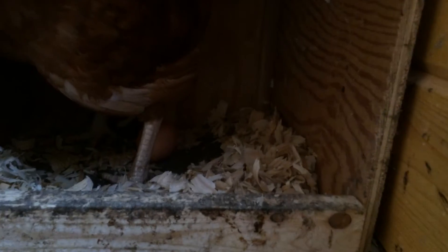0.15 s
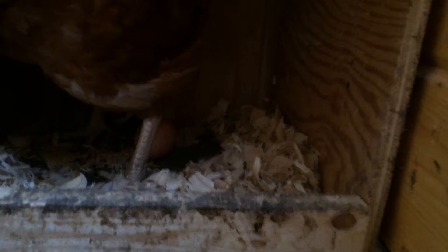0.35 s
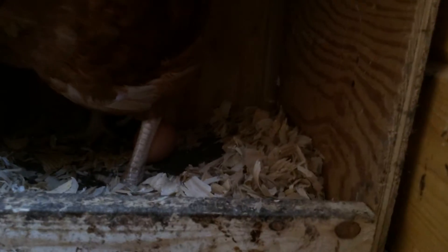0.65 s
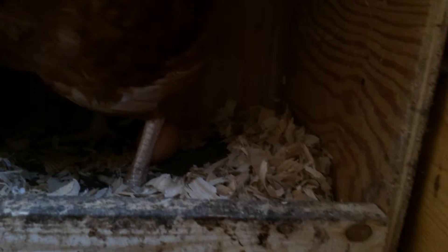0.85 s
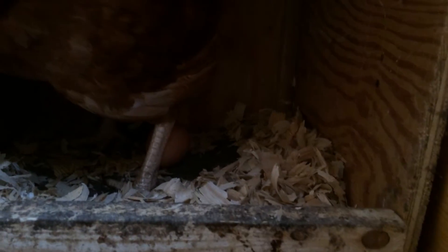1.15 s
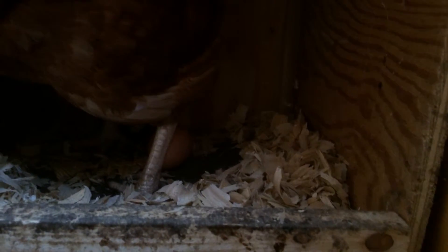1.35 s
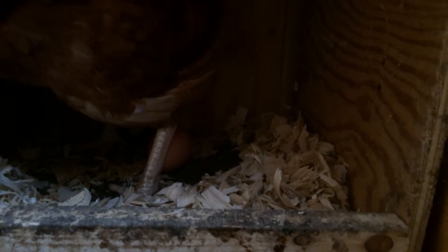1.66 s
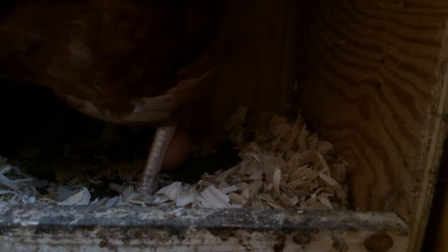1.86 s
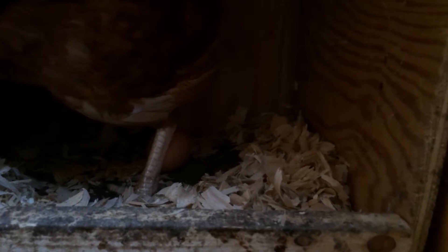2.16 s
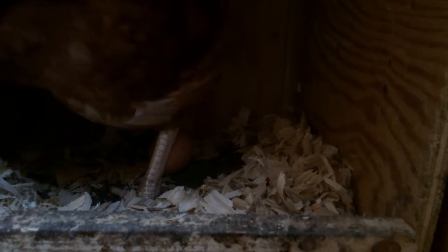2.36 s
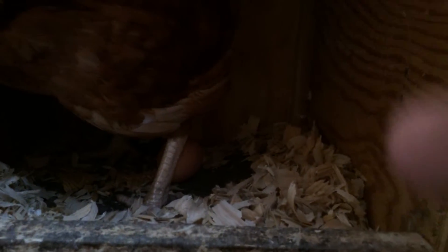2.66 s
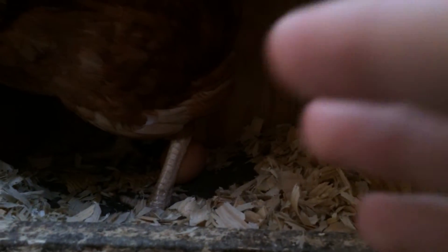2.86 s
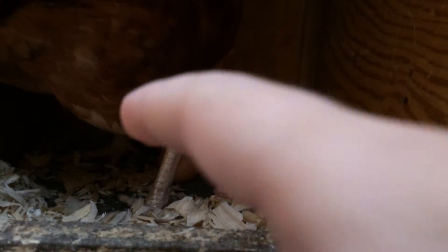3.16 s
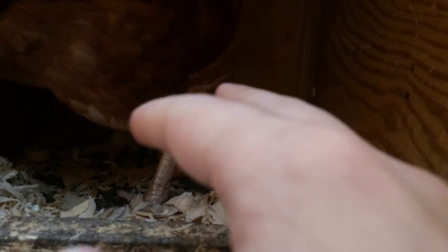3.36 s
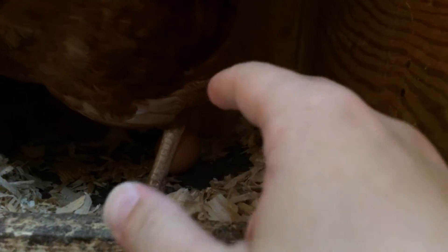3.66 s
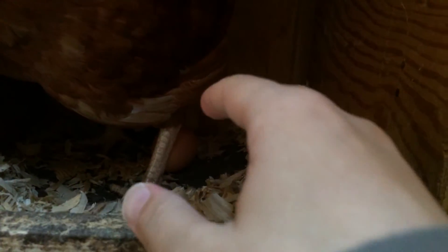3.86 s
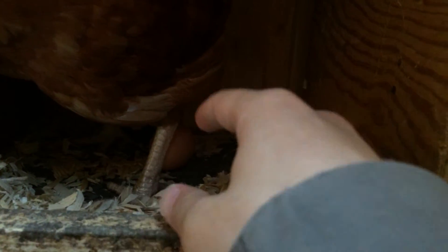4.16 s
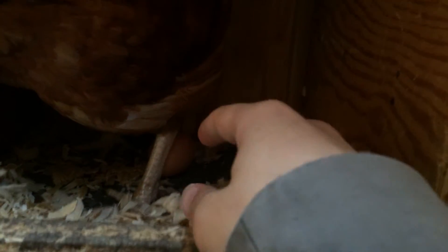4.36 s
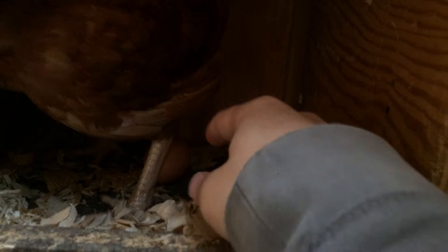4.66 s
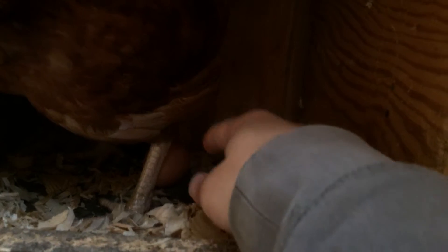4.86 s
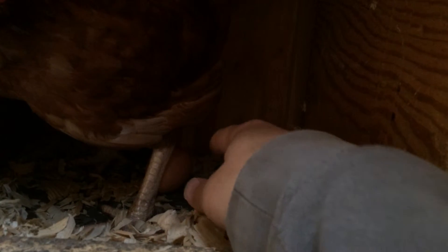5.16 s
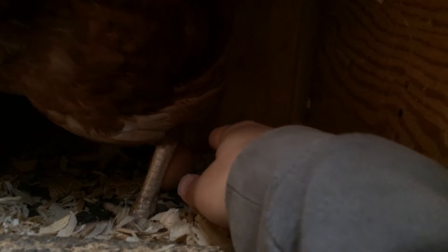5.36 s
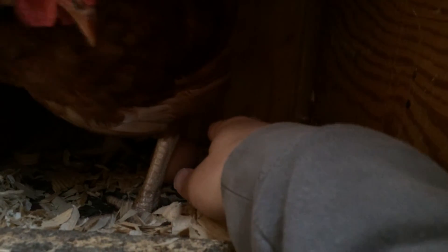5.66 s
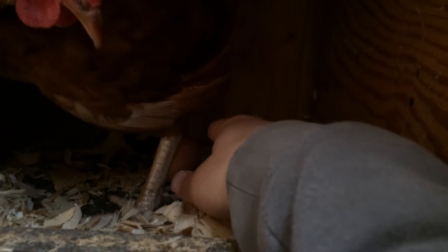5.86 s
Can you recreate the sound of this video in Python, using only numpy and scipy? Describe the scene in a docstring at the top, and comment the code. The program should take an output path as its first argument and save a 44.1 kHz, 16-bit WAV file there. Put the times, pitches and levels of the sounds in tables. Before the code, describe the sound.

One hen, heard close in a small wooden nest box, gives a long nasal whine broken by fast fluttering flicks upward, then a short rough squawk. A run of low, rapid clucks follows. After a pause she makes a brief soft coo that slides into a long, wavering moan. A low fan hum and soft airy hiss continue throughout, with a few tiny ticks of dry shavings.

```python
"""A hen in a wooden nest box protests: a whine, a squawk, a cackle, and a coo that sinks into a long moan.
Each call is a slow drone of a buzzing syrinx, heard through the resonances of throat and beak.
From it her voice flutters or leaps up onto a sharp resonance, or drops into loud, low clucks.
Wood shavings tick in the nest as short noise bursts, and the box adds scatter and a faint ring.
A fan hums and hisses in the coop: unsteady tones over coloured noise."""
import sys
import numpy as np
from scipy import signal
from scipy.fft import rfft, irfft, next_fast_len
from scipy.io import wavfile
from scipy.ndimage import map_coordinates

SR = 44100
rng = np.random.default_rng(int(sys.argv[2]) if len(sys.argv) > 2 else 0)


def int16_out(signal):
    """Quantize to a 16-bit WAV file."""
    q = np.round(np.clip(np.atleast_2d(signal).T, -1, 1) * 32767)
    wavfile.write(sys.argv[1], SR, q.astype(np.int16))


N = 265041
TIME = np.arange(N) / SR

FLICK_GAP_S = .0245  # period of the flicks in a flutter and of the quaver
SWITCH_S = 0.0054  # the time a change of register takes


def hen():
    """Source and filter: the syrinx sounds through the throat, so a note on a resonance rings out loudly."""
    pitch, effort, bright_db, rasp_db = gestures()
    return filtered(effort * syrinx(pitch, bright_db, rasp_db), throat)


def gestures(release_s=0.0075, overhang_s=0.0064, edge_dull_db=-14):
    """Motor control: slow drones carry the pitch, effort, brightness and rasp that quick gestures then pull."""
    # the drone under each call:
    # time_s, pitch_hz, effort_db, brightness_db_per_octave of overtone, rasp_db (relative)
    whine = [(0, 1105, -30.5, 3, -11), (.14, 980, -18.5, -9, -21), (.39, 970, -20.5, -2.5, -19),
             (.58, 890, -18.5, -5, -24.5), (.79, 895, -19.5, -5, -29), (.93, 930, -18.5, 1, -15),
             (1, 840, -22, -8, -0.5), (1.06, 950, -21, 0, -2.5), (1.19, 820, -17.5, -8.5, -11),
             (1.288, 870, -22.5, -5, 2.5)]
    squawk = [(1.527, 703, -31, -2.5, -23.5), (1.59, 762, -15.5, -8.5, -1), (1.636, 797, -16, -3, -29.5),
              (1.691, 815.6, -16, -5, -18), (1.76, 813.4, -16, -6, -3), (1.828, 803, -17.5, -2, -12),
              (1.869, 965, -17, -8.5, -6.5)]
    cackle = [(2.061, 670, -23.5, -3, -14.5), (2.668, 646.8, -20, -6, -4.5)]
    coo = [(3.69, 900, -27.5, -16, -26), (3.742, 985.3, -19, -16, -17), (3.862, 946.8, -18, -11, -22),
           (3.92, 969.7, -13.5, -22, -32.5), (3.968, 1100, -23.5, -6, -30), (4.02, 1018, -17.5, -10.5, -19)]
    moan = [(4.07, 764.4, -18.5, -3, -22.5), (4.108, 828.6, -20.5, -3.5, -5.5),
            (4.262, 760, -14.5, -7, -38), (4.36, 784, -13, -10, -23), (4.44, 854.4, -18.5, -6, -16.5),
            (4.6, 839, -18, -4.5, -7.5), (4.841, 809.7, -21.5, -3, -24), (5.02, 853, -22.5, -1.5, -6.5),
            (5.169, 832.2, -20, -3, -1), (5.435, 748.4, -19.5, -6, -11)]
    calls = [whine, squawk, cackle, [*coo, *moan]]
    drone = np.array(curves(np.vstack(calls)))
    pitch, effort_db, bright_db, rasp_db = cluck(leap(flutter(quaver(drone))))

    # each call starts and ends as a soft, nearly pure tone
    sounding = np.zeros(N)
    for call in calls:
        start, end = call[0][0], call[-1][0]
        inside = np.minimum(TIME - start, end - TIME) + overhang_s
        sounding += np.clip(inside / release_s, 0, 1)
    edge_db = edge_dull_db * (1 - sounding)
    return pitch, amp(effort_db) * np.sqrt(sounding), bright_db + edge_db / 2, rasp_db + edge_db


def quaver(voice, uneven=.25, bright_db_swing=-0.26):
    """Frequency modulation: an uneven tremor of pitch, with a slight dulling on each upswing."""
    # depth of the tremor on the drone: pitch_hz, share_of_pitch
    depths = [(780, 0.011), (900, 0.019), (1000, .028), (1100, .01)]
    pitch, effort_db, bright_db, rasp_db = voice
    beats = np.cumsum(1 + uneven * wobble(30)) / (FLICK_GAP_S * SR)
    swing = np.sin(2 * np.pi * beats)
    trembling = pitch * (1 + along(depths, pitch) * swing)
    return np.array([trembling, effort_db, bright_db + bright_db_swing * swing, rasp_db])


def flutter(voice):
    """Periodic register switching: a bout lifts the drone and flicks it up at a steady rate."""
    # bouts of flicks into the high register: start_s, flicks, pitch_hz, effort_db (before the swell),
    # fade_db per flick away from the second, kept (share of the lift held between flicks)
    bouts = [(.212, 4, 1118, -12.5, 3.5, .8), (0.449, 4, 1116, -14, 4.5, 1), (.644, 3, 1137, -13, 2, 0.85),
             (.849, 5, 1125, -12.5, 2.5, .2), (1.099, 3, 1130, -16.5, -0.5, .05),
             (1.751, 2, 1033, -12.5, -1, 0.19), (5.12, 2, 1122, -22, -2.5, .05)]
    margin_s, edge_s, below_hz, dip_db = .014, 0.025, 25, 12  # the lift between flicks
    half_s, swell_db, bright_db, clear_db = .0078, 4.5, -5, 5  # each flick; clear_db is taken off the rasp
    for s, flicks, hz, db, fade_db, kept in bouts:
        times = s + FLICK_GAP_S * np.arange(round(flicks))
        beat = (TIME - s) / FLICK_GAP_S
        bout_db = db - fade_db * np.abs(beat - 1)
        effort_db = bout_db + swell_db * (np.cos(2 * np.pi * beat) - .5) / 2
        lift = min(kept, 1) * gate(s - margin_s, times[-1] + margin_s, edge_s)
        voice = steer(voice, lift, hz - below_hz, db - dip_db)
        flicking = sum(gate(t - half_s, t + half_s, SWITCH_S) for t in times)
        voice = steer(voice, np.minimum(flicking, 1), hz, effort_db, bright_db, voice[3] - clear_db)
    return voice


def leap(voice, clear_db=1.5):
    """Register jump: the voice goes to the high register, holds with less rasp and falls back."""
    # single leaps: start_s, length_s, pitch_hz, effort_db, brightness_db_per_octave
    leaps = [(0.322, 0.016, 1103, -22.5, -10.5), (.35, .026, 1040, -23.5, 0.5),
             (0.416, 0.009, 1097, -16.5, -9), (.52, 0.015, 1043, -18.5, -1.5),
             (.616, 0.0105, 1017, -21, 3.5), (.714, .03, 1042, -29, 3), (.818, 0.02007, 986, -22, -0.5),
             (1.849, 0.018, 1148, -17, -3.5), (3.754, 0.013, 1178, -30.5, -1),
             (3.962, 0.01221, 1196, -23, -11), (4.139, 0.088, 1014, -15, -9), (4.711, .009, 1200, -18, -3),
             (4.916, .03, 1071, -22.5, 0.5), (5.302, 0.0074, 1119, -22, 0.5)]
    for s, length, hz, db, bright_db in leaps:
        voice = steer(voice, gate(s, s + length, SWITCH_S), hz, db, bright_db, voice[3] - clear_db)
    return voice


def cluck(voice, rasp_db=-21.5, swell_db=2.5):
    """Register break: the voice drops low, at times from a falling squeak, and glides to a held note."""
    # clucks: start_s of the held note, hold_s, pitch_hz, effort_db (before the swell),
    # brightness_db_per_octave, glide_s before the note, squeak_s before the glide
    clucks = [(0.99, .01, 817, -19, -3.5, 0.0032, 0.00031),
              (1.18, 0.01606, 788, -14.5, -7.5, 0.0031, 0.0013), (1.285, .008, 595, -17, -2.5, .014, 0.01),
              (1.536, .015, 575, -14.5, -5, 0.012, 0), (1.595, 0.015, 771, -17, -4, 0.011, .017),
              (1.711, .013, 680, -8.5, -5, .004, 0.00077), (2.09, .022, 564, -12.5, -3.5, 0.02, 0.014),
              (2.162, 0.021, 588, -13.5, -3.5, 0.02, 0.012), (2.238, .022, 603.5, -13, -3.5, 0.032, 0.018),
              (2.341, .024, 599.6, -13.5, -1.5, .061, 0.02),
              (2.409, .026, 608.5, -18.5, -1.5, 0.025, 0.019), (2.433, .035, 594.8, -16.5, -3, .001, 0),
              (2.492, 0.02326, 595.7, -14.5, -1, 0.0059, 0.0054),
              (2.547, 0.02363, 586.4, -13.5, -1.5, 0.0074, .016),
              (2.608, .015, 594.5, -16.5, -1, 0.012, .017), (2.63, 0.024, 595, -22, -0.5, 0.003, 0.0013),
              (2.649, 0.0195, 583.5, -15.5, -1.5, 0.0013, 0), (4.071, 0.01606, 717, -14, -9, .009, 0),
              (4.682, .019, 639.6, -6.5, -3, .006, 0), (5.273, 0.013, 733.4, -19, 1, .01, 0.0023),
              (5.426, 0.0083, 616, -17.5, -4, 0.0037, 0)]
    # the glide starts softer and duller than the held note
    glide_from_hz, glide_bend, glide_soft_db, glide_dull_db = 795, .7, 2, 2.5
    # every squeak falls at the same speed to the pitch where the voice breaks
    squeak_end_hz, squeak_fall_hz_per_s, squeak_db, squeak_bright_db = 930, 10000, -17.5, -8.5
    for s, hold, hz, db, bright_db, glide, squeak in clucks:
        drop = s - glide
        if squeak > 0:
            squeak_hz = squeak_end_hz + squeak_fall_hz_per_s * (drop - TIME)
            squeaking = gate(drop - squeak, drop + SWITCH_S, SWITCH_S)
            voice = steer(voice, squeaking, squeak_hz, squeak_db, squeak_bright_db, rasp_db)
        left = np.clip((s - TIME) / glide, 0, 1) ** glide_bend  # share of the glide still to go
        arch = .5 - np.clip(2 * (TIME - s) / hold - 1, -1, 1) ** 2  # the held note swells and fades
        pitch = hz + left * (glide_from_hz - hz)
        effort_db = db + arch * swell_db - left * glide_soft_db
        low = gate(drop, s + hold, SWITCH_S)
        voice = steer(voice, low, pitch, effort_db, bright_db - left * glide_dull_db, rasp_db)
    return voice


def steer(voice, share, *goal):
    """Linear blending: pull pitch, effort, brightness and rasp a share of the way to a goal."""
    pulled, on = voice.copy(), np.flatnonzero(share)
    for control, value in zip(pulled, goal):
        control[on] += share[on] * (np.broadcast_to(value, N)[on] - control[on])
    return pulled


def syrinx(pitch, bright_db, rasp_db, jitter=0.00893, shimmer_db=3.0, hoarse_db=1.93, blur=0.33,
           noise_db=6, halfway_db=-2, snap_db=7, third_db=-8, locked=.55, count=25):
    """Self-oscillation: a buzzing membrane gives overtones, period doubling, a second tone and puffs of air."""
    # every second cycle weakens, adding lines halfway between the overtones: time_s, half_length_s, level_db
    doublings = [(0.366, 0.011, -6), (0.513, 0.023, -8.5), (0.865, 0.031, -13.5), (1.098, 0.013, -7),
                 (1.758, 0.021, -16), (4.193, 0.028, -8), (4.942, 0.026, -1.5)]
    # the other side of the syrinx sounds on its own: time_s, pitch_hz, level_db (relative to the main tone)
    second_tone = [(4.75, 1141, -60), (4.88, 1157, -24.5), (5.05, 1115, -24), (5.18, 1146, -18),
                   (5.26, 1137, -13), (5.36, 1135, -30)]
    loose = np.clip((pitch - 520) / 260, 0, 1)  # the low register is the steadier one
    loose = loose * (1 - locked * np.clip((pitch - 1030) / 80, 0, 1))  # so is a note locked onto the resonance

    # the pitch trembles most in mid range and steadies where it locks onto the main resonance
    waver = np.interp(pitch, [740, 830, 980, 1090], [.016, .024, .032, .013]) * wobble(130)
    unsteady_hz = pitch * (1 + loose * (waver + jitter * wobble(600)))
    phase = 2 * np.pi * np.cumsum(unsteady_hz) / SR

    # at low pitch the membrane is open for a third of each cycle, which weakens every third overtone
    hollow_db = third_db * np.clip((800 - pitch) / 70, 0, 1)
    tone = np.zeros(N)
    for k in range(1, count + 1):
        octaves = np.log2(k)
        # a loose membrane closes unevenly, so its overtones flicker; in the low register it snaps shut
        flicker_db = hoarse_db * min(octaves, 2) * loose * wobble(150)
        closure_db = snap_db * (1 - loose) * np.clip(octaves - 2, 0, 2)
        open_db = hollow_db * (k % 3 == 0)
        slip = blur * (k - 1) * loose * wobble(400)
        level = amp(bright_db * octaves + flicker_db + closure_db + open_db)
        tone += level * np.sin(k * phase + k * k + slip)

    doubling = sum(amp(db) * bump(s, half, half) for s, half, db in doublings)
    halfway = sum(amp(halfway_db * k) * np.sin((k + .5) * phase + k * k) for k in range(4))
    tone = tone + doubling * halfway

    second_hz, second_db = curves(second_tone)
    second = amp(second_db) * np.sin(2 * np.pi * np.cumsum(second_hz) / SR)
    # the two sides share one air stream, so the second modulates the first
    tone = tone * (1 + 2 * second * np.sin(phase)) + second

    puffs = amp(rasp_db + noise_db) * (1 + 0.32 * np.cos(phase)) * rng.standard_normal(N)
    return tone * amp(shimmer_db * loose * wobble(260)) + puffs


def throat(hz, notch_hz=2000, notch_width=130, notch_db=-3):
    """Resonance: throat and beak favour bands of frequency, with a valley above the main ones."""
    # resonances of throat and beak: centre_hz, half_width_hz, level_db
    resonances = [(557, 87, -15.5), (895, 120, -16), (1168.5, 97.4, -0.5), (1475, 216, -7),
                  (2790, 320, -17), (3035, 193, -7.5), (3550, 430, -35.5), (4170, 250, -28),
                  (5250, 170, -44), (6730, 140, -47), (8430, 220, -56), (9500, 240, -62),
                  (12500, 2500, -78)]
    power = 0
    for centre, width, db in resonances:
        power = power + (amp(db) / (1 + ((hz - centre) / width) ** 2)) ** 2
    return np.sqrt(power) * amp(notch_db * np.exp(-((hz - notch_hz) / notch_width) ** 2))


def bedding(length_s=0.0045):
    """Impulsive noise: dry shavings give way with tiny ticks that start fast and die away more slowly."""
    # ticks of the wood shavings in the nest: time_s, envelope_peak_db
    shavings = [(0.247, -43.5), (.437, -50.5), (0.659, -45.5), (1.752, -44), (4.82, -53)]
    ticks = sum(amp(db) * bump(s, length_s / 4, length_s) for s, db in shavings)
    return ticks * noise([(400, -19), (1200, 2.0), (3300, 9), (6000, -4.5), (15000, -32.5)])


def nest_box(x, wet_db=-20, scatter_db=-9, scatter_t60_s=0.078, scatter_hz=2000):
    """Reverberation: close plywood walls scatter the overtones and add a short, faint ring."""
    # decay of the ring: frequency_hz, t60_s
    decay = [(200, 0.11), (700, 0.45), (1150, 0.31), (1700, 0.17), (4000, 0.1), (10000, 0.027)]
    hz, t, z = signal.stft(rng.standard_normal((2, SR // 2)), SR, nperseg=256)
    ring = z[0] * amp(-60 * t / along(decay, hz)[:, None])
    scatter = z[1] * amp(-60 * t / scatter_t60_s) * (hz > scatter_hz)[:, None]
    tails = signal.istft(np.array([ring, scatter]), SR, nperseg=256)[1]
    ring, scatter = [tail / np.linalg.norm(tail) for tail in tails]
    echoes = amp(wet_db) * ring + amp(scatter_db) * scatter
    return x + signal.fftconvolve(x, echoes)[:N]


def fan(rumble_db=-46, drift=0.15):
    """Rotation and turbulence: slightly unsteady shaft tones over rumble and rushing air."""
    # fan tones, then its faint upper tones: frequency_hz, rms_db (before the unsteadiness), unsteadiness_db
    hum = [(82.8, -59.5, -2), (109.4, -45.5, -0.5), (136.54, -37, 1), (195.6, -61, 5.5), (267.3, -71.5, 6)]
    whirr = [(819, -67, 3), (1092, -64, 2)]
    # noise spectra: frequency_hz, density_db (relative, per Hz)
    rumble = [(30, -5.5), (60, 11), (100, 17.5), (125, 20), (160, 8), (220, 6), (300, -45)]
    air = [(150, -22), (240, 2.5), (480, 1.5), (600, -6), (780, 0.5), (1400, -2), (2300, -3), (3150, 2.5),
           (3700, -5), (4500, -12), (5500, -23), (7500, -33.5), (10000, -41), (15000, -46)]
    # the hiss sinks briefly: time_s, rms_db (before the random swell)
    air_level = [(0, -44), (2.6, -48), (2.74, -49.5), (2.98, -46.5), (4.1, -45.5), (6, -47)]
    tones = np.zeros(N)
    for hz, db, unsteady_db in [*hum, *whirr]:
        level = amp(db + unsteady_db * wobble(5.4)) * np.sqrt(2)
        tones += level * np.sin(2 * np.pi * hz * TIME + drift * unsteady_db * wobble(5))
    air_db, = curves(air_level)
    swell_db = .6 * wobble(7)
    return tones + amp(rumble_db) * noise(rumble) + amp(air_db + swell_db) * noise(air)


def amp(db):
    """Logarithmic level: decibels to gain."""
    return 10 ** (np.asarray(db) / 20)


def unit(x):
    """Normalization: scale to rms 1."""
    return x / np.sqrt(np.mean(x ** 2) + 1e-20)


def along(points, hz):
    """Logarithmic frequency: read (Hz, value) points on a log axis."""
    f, v = np.transpose(points)
    return np.interp(np.log(hz + 1), np.log(f + 1), v)


def curves(rows):
    """Linear interpolation: one value per sample for each column after the time."""
    s, *cols = np.transpose(rows)
    return [np.interp(TIME, s, c) for c in cols]


def wobble(rate, points_per_knot=8):
    """Band-limited fluctuation: a smooth random curve with rate knots a second."""
    knots = rng.standard_normal(N // 32)
    grid = np.arange(0, TIME[-1] * rate + 1, 1 / points_per_knot)
    return np.interp(TIME * rate, grid, map_coordinates(knots, [grid]))


def bump(s, rise, fall):
    """Gaussian envelope: a bell of height 1 at time s, with its own rise and fall."""
    bell = np.zeros(N)
    near = slice(*np.searchsorted(TIME, [s - 4 * rise, s + 4 * fall]))
    t = TIME[near] - s
    bell[near] = np.exp(-(t / np.where(t < 0, rise, fall)) ** 2)
    return bell


def gate(start, end, edge):
    """Trapezoid envelope: 1 from start to end, with ramps of edge seconds."""
    return np.clip(np.minimum(TIME - start, end - TIME) / edge + .5, 0, 1)


def filtered(x, response):
    """Linear filtering: multiply the spectrum of x by a response of frequency."""
    m = next_fast_len(N + SR // 2)
    return irfft(rfft(x, m) * response(np.fft.rfftfreq(m, 1 / SR)), m)[:N]


def noise(spectrum):
    """Spectral shaping: coloured noise of rms 1."""
    return unit(filtered(rng.standard_normal(N), lambda hz: amp(along(spectrum, hz))))


def scene():
    """Superposition: the hen and her bedding in the box, the fan behind."""
    return (nest_box(hen() + bedding()) + fan())[None]


def record(dry, top_hz=15300):
    """Band limiting: nothing passes at or above the top frequency."""
    return filtered(dry[0], lambda hz: hz < top_hz)[None]


dry = scene()
out = record(dry)
int16_out(out)
```